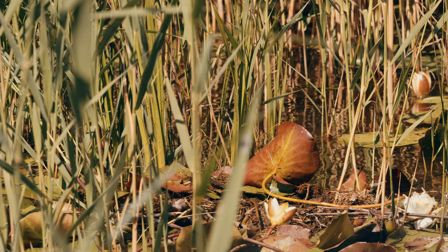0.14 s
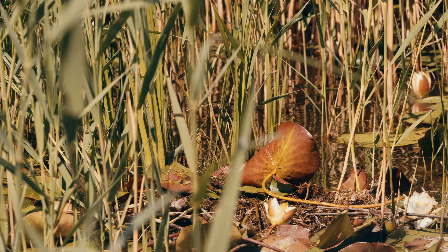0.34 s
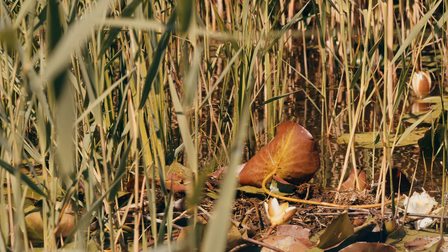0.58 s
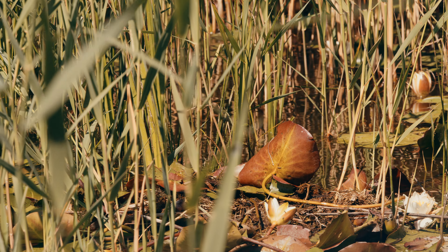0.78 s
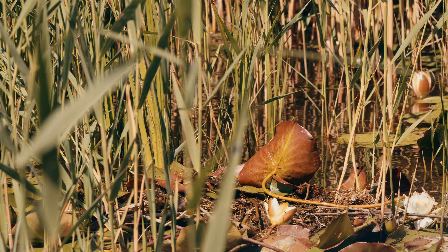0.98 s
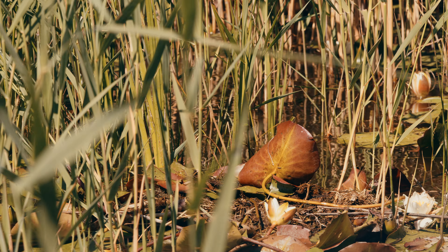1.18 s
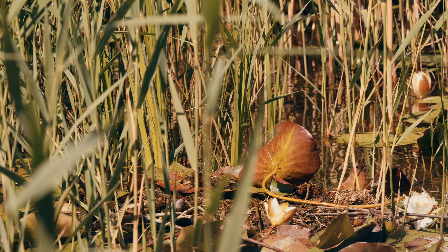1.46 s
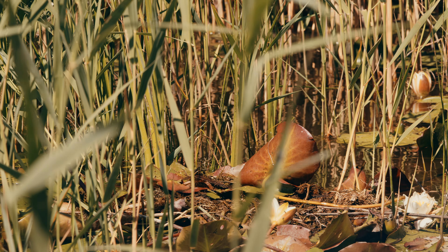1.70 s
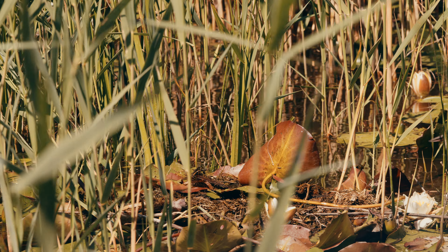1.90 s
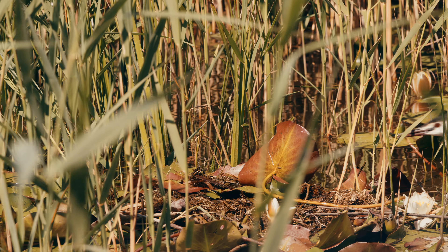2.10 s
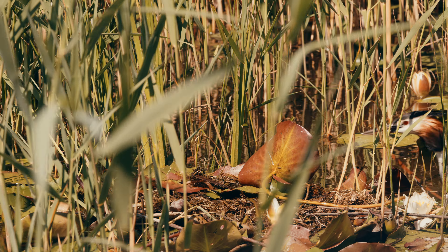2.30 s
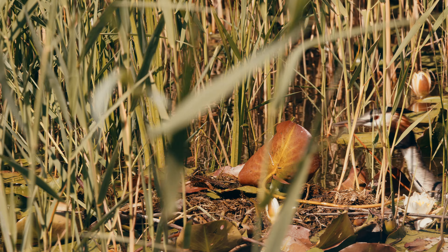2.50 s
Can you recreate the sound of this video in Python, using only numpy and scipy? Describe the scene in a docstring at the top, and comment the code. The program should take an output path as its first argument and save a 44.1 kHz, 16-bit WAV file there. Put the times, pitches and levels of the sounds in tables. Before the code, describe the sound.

A waterbird gives three short nasal honks in a reed marsh, with duck rasps between.

```python
"""Waterbirds in a reed marsh

Two microphones hear a waterbird, probably a coot, a little to the right: three nasal honks built from
harmonics on an arched pitch, and two piercing chips that are nearly pure whistles. A duck's rasps between
them are pulses of noise through throat and bill; other birds cluck and peep farther off; two sharp ticks ring.
The reeds scatter every call as decaying noise, and the far bank echoes the coot.
Beneath lie a soft rustle of filtered noise and a low, wavering distant hum."""
import sys
import numpy as np
from scipy import signal
from scipy.fft import rfft, irfft, next_fast_len
from scipy.io import wavfile
from scipy.ndimage import uniform_filter1d, map_coordinates

SR = 44100
rng = np.random.default_rng(int(sys.argv[2]) if len(sys.argv) > 2 else 0)


def digitize_waveform(pressure):
    """Quantize a signal to 16-bit integers and store it at the path in sys.argv[1].

    Rows of a 2-D input are taken as channels; values are limited to [-1, 1].
    """
    field = np.atleast_2d(pressure).T
    bounded = np.clip(field, -1, 1)
    quanta = np.round(bounded * 32767).astype(np.int16)
    wavfile.write(sys.argv[1], SR, quanta)


N = 116865

# Relative spectrum of the rustle: frequency_hz, density_db (per Hz)
RUSTLE_SPECTRUM = [(20, -0.5), (37, -5.5), (52, -9), (70, 0.5), (96, -12.5), (200, -16.5), (310, -14),
                   (500, -10.5), (750, -12), (950, -7.5), (1700, -11.5), (2100, -15.5), (4400, -17.5),
                   (9000, -26), (16000, -28)]
# Likeness of the rustle at the two microphones: frequency_hz, correlation (-1 to 1)
RUSTLE_LIKENESS = [(30, -0.28), (70, 0.18), (300, 0.42), (800, 0.19), (1600, -0.21), (3000, -0.36),
                   (6000, -0.23), (14000, -0.17)]
RUSTLE_DB = -43.5  # rms before its slow waver
HUM_HZ, HUM_DB = 69.5, -63.5  # mean pitch, rms level

# Arrival from the right at the two microphones: frequency_hz, left_lag_ms
MIC_LAG = [(875, .22), (1750, .236), (2600, .172), (3500, .167), (4400, .16), (5000, .176), (10000, .15)]
# Level difference from the right: frequency_hz, left_minus_right_db
MIC_SHADE = [(875, -6.5), (1750, -5.5), (2600, -4), (3500, -8), (5000, -6.5), (10000, -9.5), (15000, -6)]

# Echo colour of the far bank: frequency_hz, level_db
BANK_COLOUR = [(800, -12), (1750, -13), (2600, -8), (3500, -15.5), (4400, -3.5), (5000, -2.5), (7000, -17),
               (10000, -20)]
BANK_DELAY_S, BANK_DB, BANK_LEFT_MINUS_RIGHT_DB = 0.0755, -10, 14
# Decay time of the near reed scatter: frequency_hz, t60_s
REED_T60 = [(500, 0.42), (2000, .33), (5000, 0.35), (12000, 0.18)]
# Colour of the reed scatter: frequency_hz, level_db
REED_COLOUR = [(400, 5), (900, 6.5), (1750, 3.5), (2600, 5.5), (3500, 2), (5000, -1), (10000, 6)]
# Colour of the long tail before the scatter is evened out: frequency_hz, level_db
FAR_COLOUR = [(2000, 2), (8000, -9)]
REED_DB, REED_START_S = -8, 0.012
REED_AROUND = 0.45  # share of power coming from all sides
FAR_DB, FAR_T60_S = -13.5, 0.88
# Colour of the single quick return from the reed edge: frequency_hz, level_db
EDGE_COLOUR = [(875, 0), (1750, -1), (2600, -3), (3500, -10), (5000, 3.5), (10000, -7)]
EDGE_DELAY_S, EDGE_DB = 0.017, -18.5

# Distant peeps: start_s, length_s, pitch_hz, level_db
PEEPS = [(1.389, .03, 1250, -42), (1.654, .026, 1271, -40), (1.845, .028, 1242, -37.5),
         (2.43, 0.024, 1325, -39), (2.466, 0.031, 4270, -48.5), (2.576, 0.055, 4340, -58)]
# Clucks: start_s, length_s, first_pitch_hz, last_pitch_hz, level_db, brightness_db_per_octave
CLUCKS = [(.336, 0.0073, 940, 1036, -31.5, -25), (0.364, .010, 820, 1400, -28.5, -24),
          (.383, 0.023, 895, 725, -28, -2), (0.401, 0.026, 717, 664, -37, 4.5),
          (.714, 0.0064, 1160, 777, -33, -12), (0.936, 0.0096, 1130, 800, -31.5, -9),
          (2.128, 0.0071, 973, 743, -36.5, -1.5), (2.16, 0.0069, 1630, 1410, -28.5, -22)]
# Harmonics of a cluck: multiple, level_db
CLUCK_PARTIALS = [(1, 0), (2, 0), (3, -17.5)]
# Ticks: start_s, pitch_hz, level_db
TICKS = [(1.4269, 3492, -23), (1.5387, 5110, -22)]
# Noise colour of a tick's crack: frequency_hz, level_db
CRACK_COLOUR = [(1500, -28), (4000, 13), (7500, 4), (10000, -12), (16000, -6)]

# Duck rasps: loudest_s, rise_s, fall_s, level_db, hiss_db
RASPS = [(.942, 0.039, 0.019, -33, -12.5), (1.249, 0.046, 0.035, -28.5, -13.5),
         (1.487, 0.04, 0.03, -27.5, -16), (1.787, 0.049, 0.036, -27, -14.5),
         (2.117, 0.035, 0.023, -31.5, -18), (2.348, 0.034, 0.026, -27, -13)]
# Resonances of the duck's throat: frequency_hz, level_db
THROAT = [(300, -45), (900, -19), (1250, -12), (1500, 1), (1750, -1.5), (1950, 4), (2130, -7), (2300, 2.5),
          (2620, -11), (2930, 0), (3250, -19), (3600, -11.5), (4200, -28), (7000, -40.5)]
# Colour of the hiss in the duck's bill: frequency_hz, level_db
BILL = [(2500, -40), (4000, -4), (4570, 8), (4800, -1), (5060, 6), (5600, 7), (6300, 4), (7000, -9),
        (8200, -16), (11000, -48), (16000, -42)]
# Spread of each rasp pulse, lowest band first: frequency_hz, delay_s
RASP_DELAY = [(1500, 0.001), (2200, 0.0029), (3100, 0.0023), (4500, 0.0029)]
RASP_RATE_HZ, RASP_PULSE_S, RASP_SCATTER_S = 101, 0.0044, 0.0006
RASP_EDGE_DB = 9  # drop from the loudest moment after one rise or fall time

# Chips: start_s, length_s, pitch_hz, level_db
CHIPS = [(0.201, 0.0095, 4973, -17.5), (1.6278, 0.013, 5048, -16.5)]
# Harmonics of a chip: multiple, level_db
CHIP_PARTIALS = [(1, -0.5), (2, -15), (3, -25)]
CHIP_ARCH = 0.015  # fraction of pitch lost at either end

# Honks: start_s, length_s, top_pitch_hz, level_db, brightness_db_per_octave, pitch_arch_depth
HONKS = [(0.2092, 0.05, 882.8, -13, -1.5, 1), (1.0179, .047, 875.7, -13.5, 1, 1),
         (1.8805, 0.045, 842.3, -16.5, -5, 0.47)]
# Harmonics of a honk: multiple, level_db
HONK_PARTIALS = [(1, -13), (2, -1.5), (3, -12), (4, -14.5), (5, -19), (6, -28.5), (7, -32.5), (8, -38),
                 (9, -39), (10, -44), (11, -47), (12, -54), (13, -52)]
# Noise colour of the breath on a honk: frequency_hz, level_db
HONK_AIR_COLOUR = [(500, -26), (1200, 5), (2200, 2), (3100, 3), (5000, -5), (6500, -17.5), (9000, -9.5),
                   (12000, -26)]
HONK_AIR_DB = -27
HONK_ATTACK_S, HONK_RELEASE_S, HONK_CREST_S = 0.0033, 0.0063, 0.018
# Pitch slopes either side of the crest and the extra drop at the close, all times the arch depth
RISE_HZ_PER_S, SAG_HZ_PER_S = 890, 930
SAG_END_HZ, SAG_END_S = 24, 0.009
SWELL_DB, SWELL_S = 11, 0.0045  # bloom of the second partial
JITTER = 0.0012  # fraction of pitch
FLUTTER_DB = 1.38  # per octave: higher partials are less steady

TOP_HZ = 16000


def amp(db):
    """Decibels to gain."""
    return 10 ** (np.asarray(db) / 20)


def unit(x):
    """Scale to rms 1."""
    return x / np.sqrt(np.mean(x ** 2) + 1e-20)


def along(points, hz):
    """Read (Hz, value) points on a log frequency axis."""
    f, v = np.transpose(points)
    return np.interp(np.log(hz + 1), np.log(f + 1), v)


def since(s):
    """Seconds since time s, for every sample."""
    return np.arange(N) / SR - s


def wobble(rate):
    """A smooth random curve with rate knots a second."""
    knots = rng.standard_normal(int(N * rate / SR) + 4)
    return map_coordinates(knots, [np.arange(N) * rate / SR])


def filtered(x, response):
    """Multiply the spectrum of x by a complex response of frequency."""
    m = next_fast_len(N + SR // 2)
    return irfft(rfft(x, m) * response(np.fft.rfftfreq(m, 1 / SR)), m)[..., :N]


def delayed(hz, seconds):
    """Phase response of a pure delay."""
    return np.exp(-2j * np.pi * hz * seconds)


def air(colour):
    """Noise of rms 1 with a (Hz, dB) colour."""
    return unit(filtered(rng.standard_normal(N), lambda hz: amp(along(colour, hz))))


def gate(t, length, attack, release):
    """Smooth attack, hold, and a release centred on the end."""
    opening = np.sin(np.pi / 2 * np.clip(t / attack, 0, 1))
    closing = np.sin(np.pi / 2 * np.clip((length - t) / release + 0.5, 0, 1)) ** 2
    return opening * closing


def voice(pitch, envelope, partials):
    """Sum sine harmonics (multiple, dB) on a pitch curve, under an envelope."""
    on = envelope > 0
    phase = 2 * np.pi * np.cumsum(pitch[on]) / SR
    tone = sum(amp(np.broadcast_to(db, N)[on]) * np.sin(k * phase) for k, db in partials)
    out = np.zeros(N)
    out[on] = envelope[on] * tone
    return out


def background(waver_db=0.6):
    """Wide filtered noise for the rustle of reeds and air, and a hum wavering in pitch and level."""
    def mid_side(hz):
        # the angle between mid and side sets the likeness of left and right
        turn = np.arccos(np.clip(along(RUSTLE_LIKENESS, hz), -1, 1)) / 2
        return amp(along(RUSTLE_SPECTRUM, hz)) * [np.cos(turn), np.sin(turn)]

    mid, side = filtered(rng.standard_normal((2, N)), mid_side)
    rustle = unit(np.array([mid + side, mid - side])) * amp(RUSTLE_DB + waver_db * wobble(5.74))
    hum_phase = 2 * np.pi * np.cumsum(HUM_HZ + 2 * wobble(8)) / SR
    hum = unit(np.sin(hum_phase) * amp(2.5 * wobble(6)))
    return rustle + amp(HUM_DB) * hum


def from_right(x, shade=1):
    """Place a source to the right by lag and level; shade scales the level difference."""
    def both(hz):
        # half of each difference goes to either microphone
        left = amp(shade * along(MIC_SHADE, hz) / 2) * delayed(hz, along(MIC_LAG, hz) / 2000)
        return np.array([left, 1 / left])

    return filtered(x, both)


def bank(x):
    """Delay and colour a single echo from the far bank, louder on the left."""
    echo = filtered(x, lambda hz: amp(along(BANK_COLOUR, hz)) * delayed(hz, BANK_DELAY_S))
    return amp(BANK_DB + BANK_LEFT_MINUS_RIGHT_DB * np.array([[0.5], [-0.5]])) * echo


def reeds(x, build_s=0.0036):
    """Convolve with decaying noise: dense stem scatter, partly from the right, and a faint longer tail."""
    hz, t, z = signal.stft(rng.standard_normal((3, SR)), SR, nperseg=256)
    near = amp(-60 * t / along(REED_T60, hz)[:, None]) * (1 - np.exp(-t / build_s))
    near = amp(REED_DB) * near / np.linalg.norm(near, axis=1, keepdims=True)
    far = amp(-60 * t / FAR_T60_S) * amp(along(FAR_COLOUR, hz))[:, None]
    far = amp(FAR_DB) * far / np.linalg.norm(far[0])
    tail = signal.istft(z * np.hypot(near, far), SR, nperseg=256)[1][:, :SR]

    # even out the spectrum so no pitch is favoured, then set level and colour (bins are 1 Hz apart)
    spectrum = rfft(tail)
    spectrum /= np.sqrt(np.abs(uniform_filter1d(np.abs(spectrum) ** 2, size=70, axis=1)))
    colour = amp(REED_DB + along(REED_COLOUR, np.arange(spectrum.shape[1])))
    tail = irfft(spectrum * colour)[:, :SR * 3 // 4]

    late = np.pad(x, (round(REED_START_S * SR), 0))
    wet = signal.fftconvolve(late[None], tail, axes=1)[:, :N]
    return np.sqrt(REED_AROUND) * wet[:2] + np.sqrt(1 - REED_AROUND) * from_right(wet[2], shade=0.2)


def reed_edge(x):
    """Delay and colour a single quick return from the reed edge, just after the scatter begins."""
    return amp(EDGE_DB) * filtered(x, lambda hz: amp(along(EDGE_COLOUR, hz)) * delayed(hz, EDGE_DELAY_S))


def peeps(arch=0.075, rough=0.046):
    """Faint sine notes with arched, unsteady pitch, from birds deep in the reeds."""
    out = np.zeros(N)
    for s, length, hz, db in PEEPS:
        t = since(s)
        pitch = hz * (1 - arch * (2 * t / length - 1) ** 2 + rough * wobble(700))
        envelope = amp(db) * gate(t, length, attack=0.0079, release=0.014)
        out += voice(pitch, envelope, [(1, 0)])
    return out


def clucks(rough=0.018):
    """Soft gliding notes of three harmonics, from another bird straight ahead."""
    out = np.zeros(N)
    for s, length, first, last, db, bright in CLUCKS:
        t = since(s)
        pitch = np.interp(t, [0, length], [first, last]) * (1 + rough * wobble(600))
        envelope = amp(db) * gate(t, length, attack=0.0055, release=0.0073)
        partials = [(k, level + bright * np.log2(k)) for k, level in CLUCK_PARTIALS]
        out += voice(pitch, envelope, partials)
    return out


def ticks(t60=0.02, crack_db=-1, crack_t60=0.0079):
    """Sharp ticks: a brief decaying sine and a shorter bright crack of noise."""
    out = np.zeros(N)
    for s, hz, db in TICKS:
        t = np.maximum(since(s), 0)
        onset = 1 - np.exp(-t / 0.0004)
        ring = np.sin(2 * np.pi * hz * t) * amp(-60 * t / t60)
        crack = air(CRACK_COLOUR) * amp(crack_db - 60 * t / crack_t60)
        out += amp(db) * onset * (ring + crack)
    return out


def rasps(between=0.15, steep=3.0, snap=1.0):
    """Slow uneven pulses, each a snap and a puff of air through the duck's throat and bill."""
    throat, bill = np.zeros(N), np.zeros(N)
    for s, rise, fall, db, hiss_db in RASPS:
        t = since(s)
        beats = np.arange(-12, 13) / RASP_RATE_HZ
        beats = np.sort(beats - 0.005 + RASP_SCATTER_S * rng.standard_normal(len(beats)))
        latest = beats[np.maximum(np.searchsorted(beats, t) - 1, 0)]
        age = np.abs(t - latest) / RASP_PULSE_S
        puffs = between + 2 * age * np.exp(1 - 2 * age)  # some air leaks between pulses
        clicks = np.bincount(np.searchsorted(t, beats + 0.00099), minlength=N)[:N]
        snaps = clicks * np.sqrt(SR / RASP_RATE_HZ) / 2
        effort = amp(db - RASP_EDGE_DB * np.abs(t / np.where(t < 0, rise, fall)) ** steep)
        throat += effort * (1.14 * puffs * rng.standard_normal(N) + snap * snaps)
        bill += effort * amp(hiss_db) * puffs * rng.standard_normal(N)

    def tract(colour):
        def response(hz):
            # summing the delay over frequency gives the phase that spreads each pulse
            phase = 2 * np.pi * np.cumsum(along(RASP_DELAY, hz)) * hz[1]
            return unit(amp(along(colour, hz))) * np.exp(-1j * phase)
        return response

    return filtered(throat, tract(THROAT)) + filtered(bill, tract(BILL))


def chips():
    """Very short, nearly pure whistles with a slight arch of pitch."""
    out = np.zeros(N)
    for s, length, hz, db in CHIPS:
        t = since(s)
        pitch = hz * (1 - CHIP_ARCH * (2 * t / length - 1) ** 2)
        envelope = amp(db) * gate(t, length, attack=0.0062, release=0.0059)
        out += voice(pitch, envelope, CHIP_PARTIALS)
    return out


def honks():
    """Harmonics snap on, rise to a crest and sag while the second partial blooms; a little air rides on them."""
    out, blown = np.zeros(N), np.zeros(N)
    for s, length, hz, db, bright, arch in HONKS:
        t = since(s)
        rising = RISE_HZ_PER_S * (HONK_CREST_S - t)
        sagging = SAG_HZ_PER_S * (t - HONK_CREST_S)
        closing = SAG_END_HZ * np.clip((t - length) / SAG_END_S + 1, 0, 2)
        pitch = hz - arch * (np.maximum(rising, sagging) + closing)
        bloom = -SWELL_DB * np.exp(-np.abs(t) / SWELL_S)
        partials = []
        for k, level in HONK_PARTIALS:
            tilt = bright * np.log2(max(k / 2, 1))
            flutter = FLUTTER_DB * np.log2(k) * wobble(180)
            partials.append((k, level + tilt + (bloom if k == 2 else 0) + flutter))
        envelope = gate(t, length, HONK_ATTACK_S, HONK_RELEASE_S) * amp(db + 0.2 * wobble(500))
        out += voice(pitch * (1 + JITTER * wobble(700)), envelope, partials)
        blown += envelope * amp(bright)  # brighter honks carry more air
    return out + amp(HONK_AIR_DB) * blown * air(HONK_AIR_COLOUR)


def scene(duck_wet_db=-5, small_wet_db=-7):
    """Coot, duck and ticks to the right, small voices ahead, all answered by the marsh."""
    small, tick = clucks() + peeps(), ticks()
    duck = rasps()
    coot = honks() + chips()
    into_reeds = coot + amp(duck_wet_db) * duck + amp(small_wet_db) * (small + tick)
    wet = reeds(into_reeds) + bank(coot)
    edge = from_right(reed_edge(coot), shade=-0.35)  # later but slightly louder on the left in every band
    edge_and_direct = from_right(coot + duck + tick) + edge
    return background() + wet + small + edge_and_direct


def record(dry):
    """Keep nothing at or above the band limit."""
    return filtered(dry, lambda hz: hz < TOP_HZ)


dry = scene()
out = record(dry)
digitize_waveform(out)
```